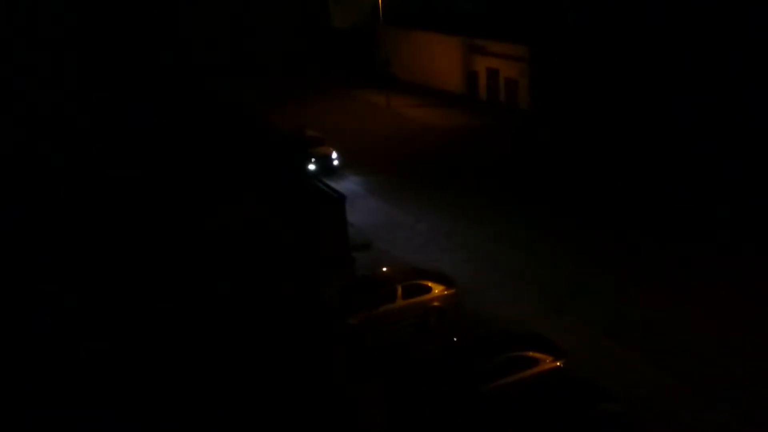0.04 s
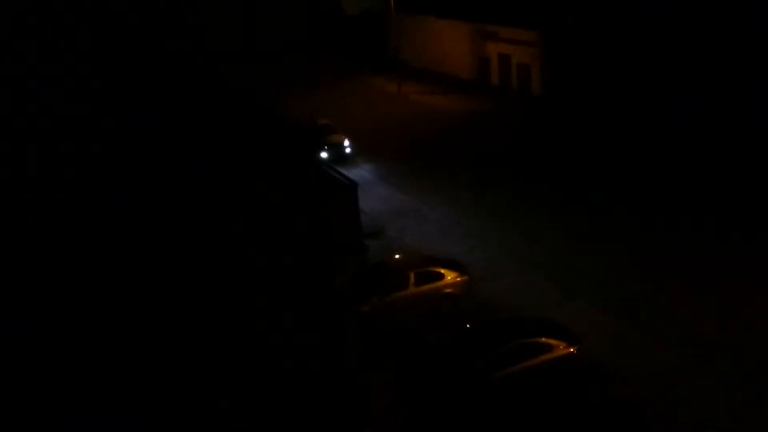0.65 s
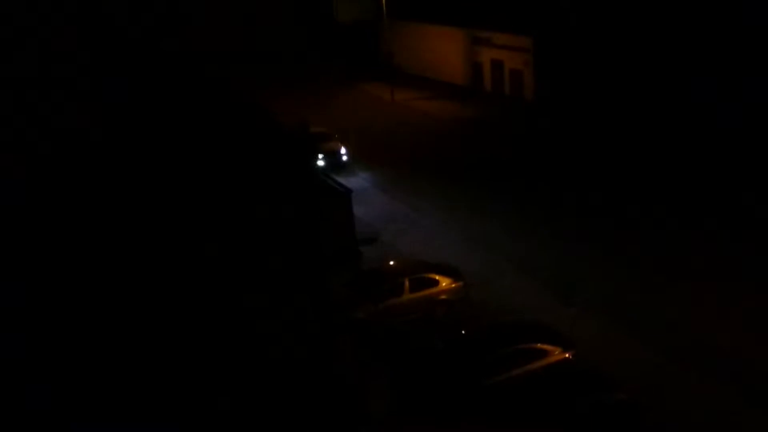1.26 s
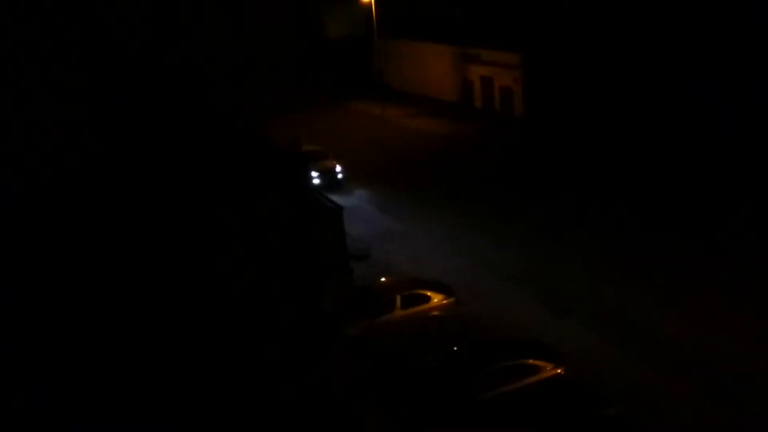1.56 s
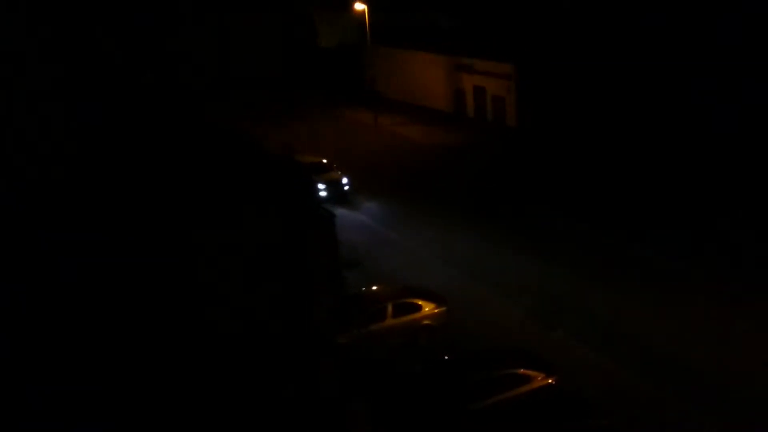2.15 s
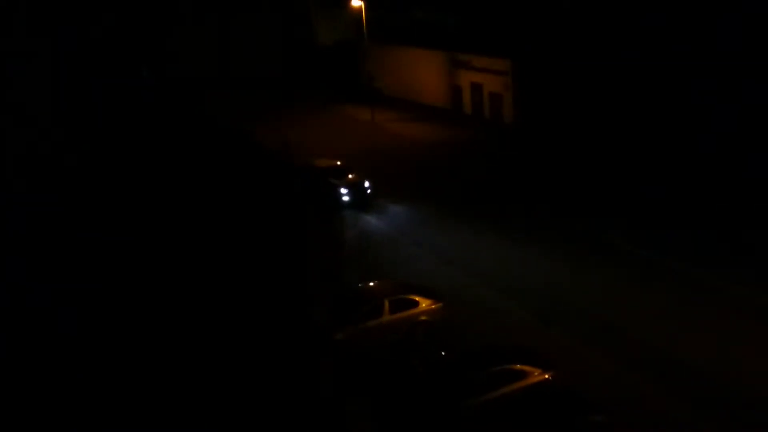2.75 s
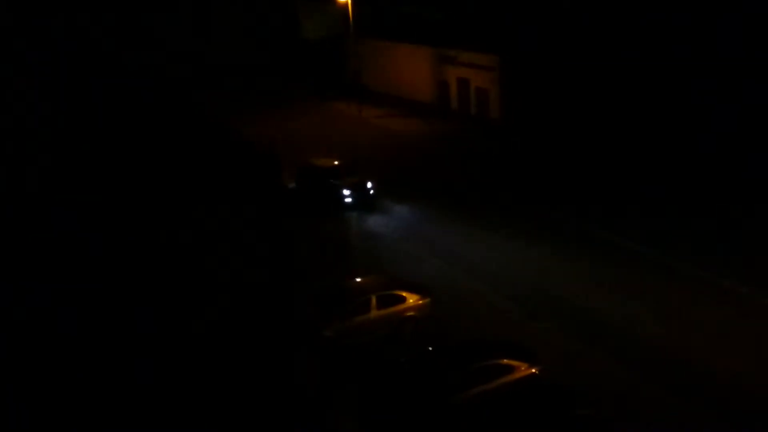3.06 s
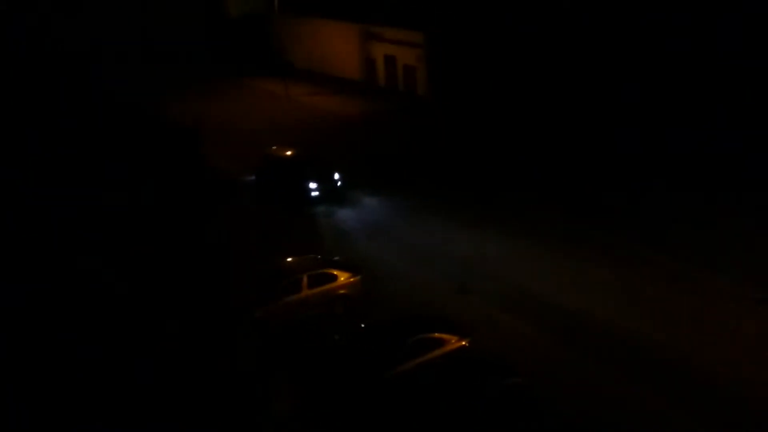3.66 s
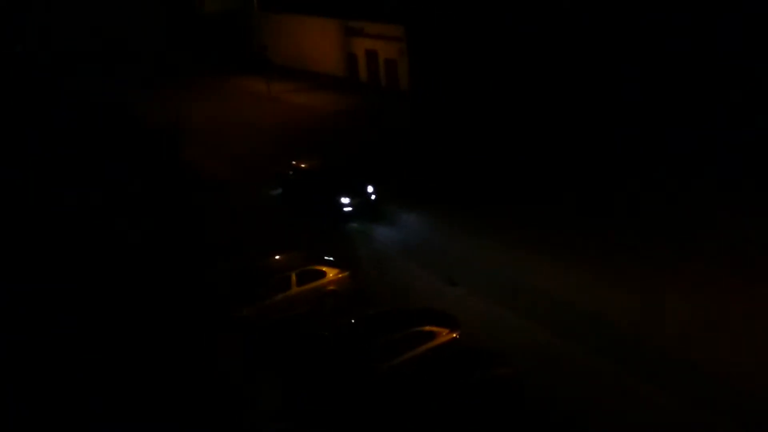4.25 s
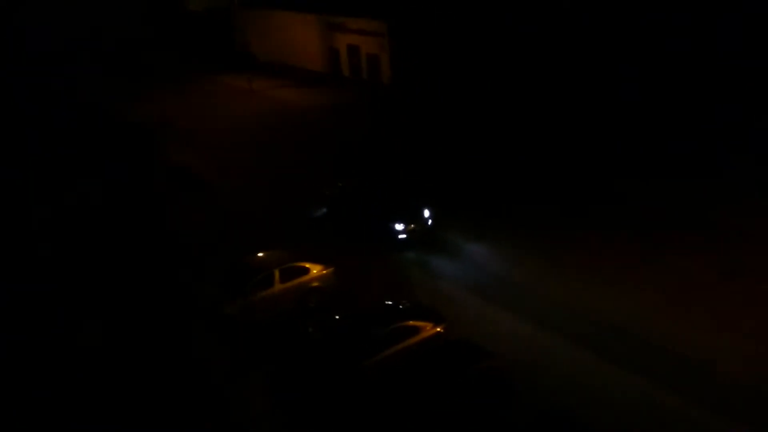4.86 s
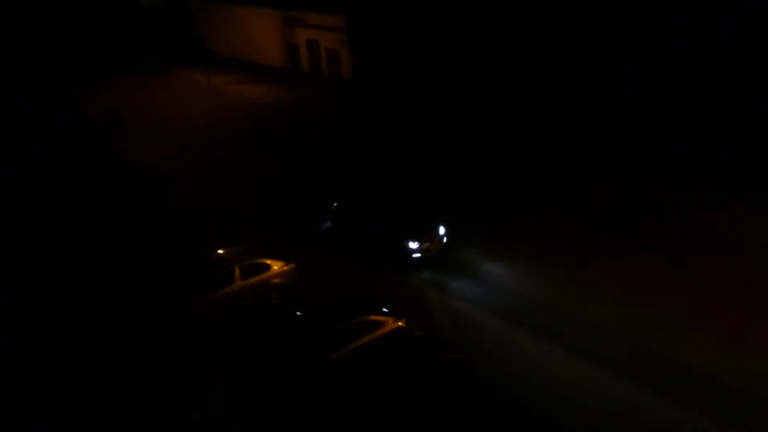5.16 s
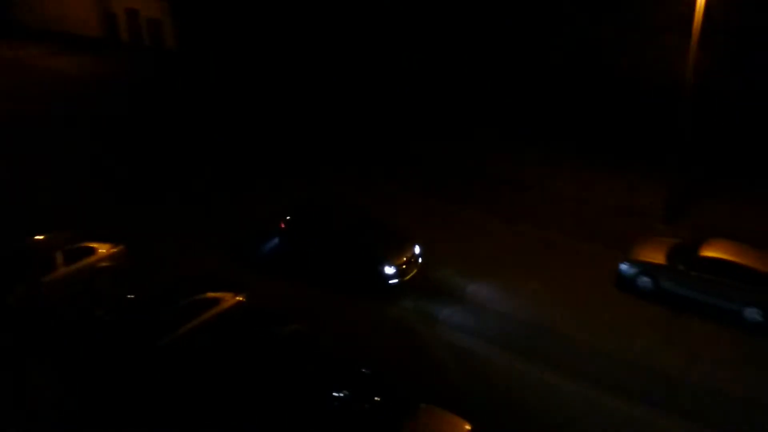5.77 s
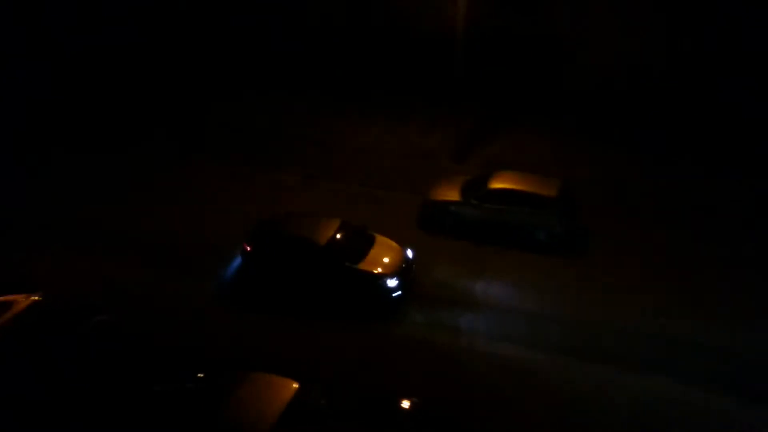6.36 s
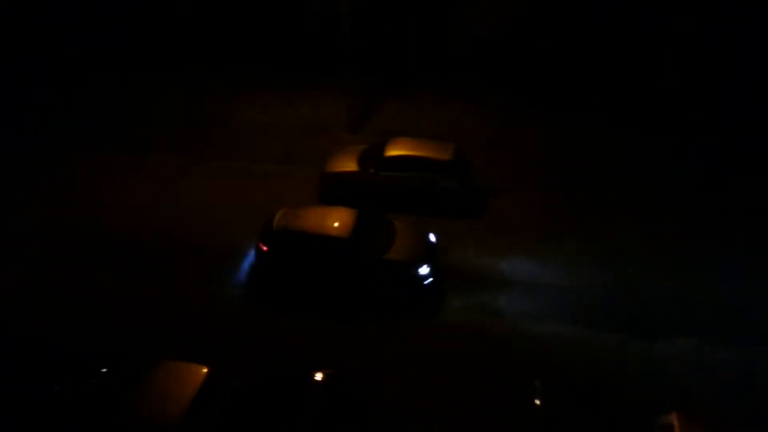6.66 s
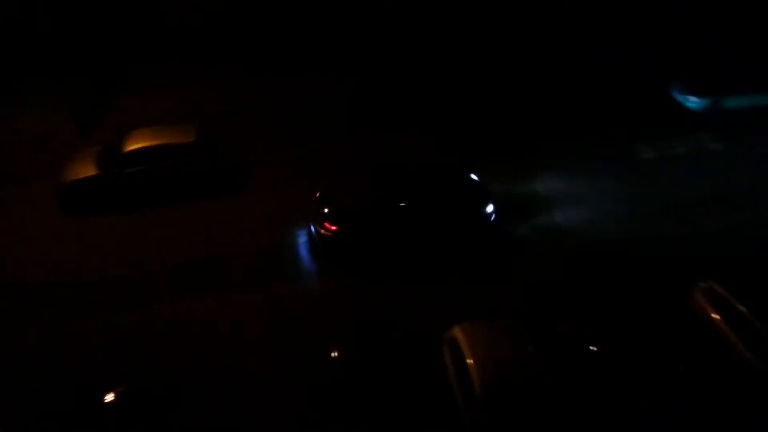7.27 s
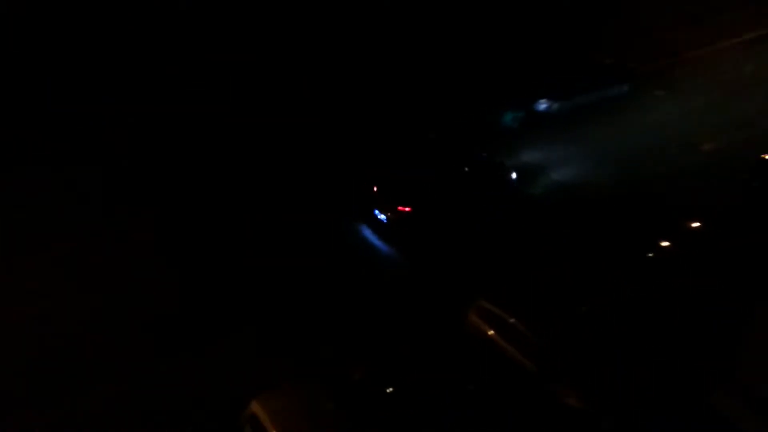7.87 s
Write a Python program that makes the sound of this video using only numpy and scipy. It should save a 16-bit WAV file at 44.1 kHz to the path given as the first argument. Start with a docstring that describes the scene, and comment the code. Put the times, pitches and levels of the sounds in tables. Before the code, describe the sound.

Over a low town hum, a sports car growls closer in two bursts of throttle, each ending in sharp exhaust pops.

```python
"""Sports car on a night street

From above, between house fronts, a two-port microphone hears a loud four-cylinder car come up to 16 m.
It pulls, lifts off with a bang and a puff of air, pulls harder and lifts off with a volley of backfires.
Firings ring the exhaust, intake air rushes and tyres roar, at levels set by distance, revs and throttle.
The town hums behind it."""
import sys
import numpy as np
from scipy import signal
from scipy.fft import rfft, irfft, next_fast_len
from scipy.io import wavfile
from scipy.ndimage import uniform_filter1d

SR = 44100
rng = np.random.default_rng(int(sys.argv[2]) if len(sys.argv) > 2 else 0)


def master(y):
    """Save y as 16-bit WAV."""
    cut = np.clip(np.atleast_2d(y).T, -1, 1)
    pcm = np.round(cut * 32767)  # scale
    wavfile.write(sys.argv[1], SR, pcm.astype(np.int16))


N = 353682
TIME = np.arange(N) / SR

# The microphone's left port against its right. Each row: frequency in Hz, gain in dB.
LEFT_PORT_GAIN = [(60, -5), (200, -6.5), (400, -9.5), (750, -8), (1100, -13), (1500, -17.5), (2400, -9.5),
                  (3300, -6.5), (4600, -7.5), (6300, 4), (9000, 1.5), (12500, -9.5), (16000, -10)]
# Its lead, on top of opposite polarity. Each row: frequency in Hz, phase in radians.
LEFT_PORT_LEAD = [(260, 0), (1000, .3), (2000, 3.2), (3500, 3.7), (4700, 10), (5400, 11.7), (8600, 15.7),
                  (12000, 28), (16000, 48)]
# Diffuse sound at the two ports. Each row: frequency in Hz, likeness from 0 to 1.
PORT_LIKENESS = [(60, 0.92), (300, 0.71), (700, 0.76), (1400, 0.01), (3000, 0.06)]

# Noise colours. Each row: frequency in Hz, relative level in dB.
TOWN_SPECTRUM = [(25, -33), (55, -5.5), (80, -5), (400, -10.5), (600, -1), (770, 0), (1100, -1),
                 (1600, -2.5), (2200, -15), (3000, -31), (4600, -38), (7000, -35), (11000, -43.5),
                 (15000, -39)]
ROAR_SPECTRUM = [(30, -15.5), (100, -5.5), (380, -5), (700, 0.5), (1000, 1.5), (1700, 2.5), (2200, -5),
                 (3000, -13), (4000, -27), (5000, -48), (7000, -26), (11000, -43), (16000, -78)]
AIR_SPECTRUM = [(800, -38), (2000, -35), (3100, 9.5), (3900, -24), (4700, -6.5), (5500, 1.5), (7500, -7),
                (9500, -5.5), (11000, -14), (12800, -7.5), (16000, -17.5)]
CRACK_SPECTRUM = [(30, 5), (400, -35), (1500, -22.5), (3300, 3.5), (4200, -2.5), (5500, 0.5), (9500, -7.5),
                  (11000, -17.5), (13000, -10), (16000, -30)]

# Clicks close by. Each row: start in seconds, pitch and width in Hz, drive in dB, decay in seconds.
NEAR_TICKS = [(1.730, 6100, 2200, -43, .003), (1.739, 7300, 3000, -42, .003),
              (1.746, 6200, 2200, -35, .003), (1.753, 4500, 2200, -37, .003),
              (1.766, 2200, 3000, -30, .0008), (1.803, 7500, 3500, -44, .003),
              (1.815, 7800, 2600, -35, .0007)]
# Dull knocks far off, and a short scuff. Each row: start in seconds, drive in dB.
FAR_KNOCKS = [(2.719, -44), (2.786, -45), (2.825, -48)]
SCUFF_STROKES = [(3.42, -37.5), (3.44, -48)]
# A thin, high sizzle. Each row: centre and half width in seconds, level in dB.
SIZZLE_SWELLS = [(1.951, 0.76, -62), (2.9, 0.29, -60.5), (3.32, 0.24, -54)]

# Crankshaft speed. Each row: time in seconds, turns per second.
CRANK_SPEED = [(4.0, 32.8), (4.3, 35.6), (4.5, 38), (4.8, 44.8), (4.97, 48.6), (5.06, 52), (5.21, 55.8),
               (5.45, 46.3), (5.6, 39.8), (5.95, 33.8), (6.1, 38.2), (6.23, 36.4), (6.33, 37.8), (6.66, 40),
               (7.09, 44.8), (7.32, 47.8), (7.55, 51), (7.66, 45.3), (8.02, 36.4)]
# The driver's pulls. Each row: throttle opening and shutting in seconds, rasp flare and valve gain in dB.
THROTTLE_PULLS = [(4.096, 5.243, 1, -31), (6.019, 7.596, 9.5, -38)]
# Spits and backfires. Each row: start in seconds, then drive of bang, crack and thump in dB.
BACKFIRES = [(5.174, -12, -54, -30), (5.207, -2, -37, -9), (5.218, -8, -36, -16), (5.224, -9, -33, -18),
             (5.229, -10, -34, -16), (5.237, -5, -38, -18), (5.631, -9, -58, -23), (6.674, -4.5, -62, -25),
             (7.006, -5, -62, -32), (7.259, -5, -62, -32), (7.519, -4, -45, -28), (7.543, -3, -42, -24),
             (7.550, -1, -38, -20), (7.558, 5, -27, -22), (7.567, -4, -28, -25), (7.581, 4.5, -25, -21),
             (7.590, 7, -11, -18), (7.602, 5, -18, -17), (7.613, 5, -20, -13), (7.619, 2, -25, -18),
             (7.624, -2, -26, -15), (7.636, -6, -31, -21)]
# Brief rises and dips of the exhaust. Each row: centre and half width in seconds, change in dB.
BOOM_SURGES = [(5.35, 0.028, -10), (5.85, 0.071, -1), (6.02, 0.05, -11), (7.15, 0.048, -10.5),
               (7.54, 0.11, 10)]
GROWL_SURGES = [(4.35, .06, 4), (4.92, .07, 2.5), (5.03, .033, -4), (5.185, .06, 8), (6.42, .1, 2),
                (6.62, .08, 3), (6.92, .06, 2), (7.09, .085, 5.5), (7.27, .07, -7), (7.42, .045, 4),
                (7.55, .045, -5), (7.68, .07, 6.5)]
SONG_SWELLS = [(6.69, .04, 3), (6.8, .06, 2), (7.05, .06, 4), (7.14, .02, 2), (7.21, .025, -6),
               (7.31, .05, -3), (7.44, .05, 1), (7.56, .035, 6)]

# The car's resonances. Each row: frequency and width in Hz, relative gain in dB.
PIPE_MODES = [(117, 5, 6), (181, 15, -1), (226, 14, -6), (275, 16, 6), (292, 7, 1), (370, 70, -15),
              (515, 30, -3.5), (692, 18, -4)]  # standing waves of the pipe
BURBLE_MODES = [(245, 60, -4), (520, 50, -2), (680, 60, -4)]  # the silencer under uneven firings
RASP_MODES = [(810, 130, -7), (1070, 200, -4), (1400, 130, -2), (1700, 180, -2), (1940, 140, -7),
              (3270, 450, -16), (5500, 600, -20)]  # ring of silencer and tailpipe
SONG_MODES = [(1045, 30, -9), (1116, 28, 0), (1408, 40, -11)]  # the tailpipe's narrow, singing modes
BLAST_MODES = [(560, 280, -9), (830, 170, -5.5), (1120, 230, -3), (1420, 230, 0), (1700, 220, -2.5),
               (1950, 150, -5)]  # the tailpipe rung broadly by a blast
THUMP_MODES = [(88, 11, -8), (205, 41, -21), (268.4, 16, 3), (401, 570, -18), (607, 270, -11),
               (860, 67, -7)]  # the gas column
LIP_MODES = [(3420, 410, -2.5)]  # the lip of the tailpipe
VALVE_HISS_MODES = [(2420, 810, -5), (6020, 300, -12)]  # the relief valve blowing
VALVE_SPURT_MODES = [(3480, 340, -1), (5000, 1100, 5)]  # the valve cracking open
NOSE_HISS_MODES = [(4260, 870, -2.5), (6200, 480, -6)]
NOSE_WHINE_MODES = [(1678, 220, 0)]

# Level laws. Each row, in dB: base level when nearest at cruising revs, then the change per halving
# of distance, per doubling of revs, with the throttle shut and while the corner hides the car.
BOOM_LAW = (-26.5, 9, -13, -5.5, -22)
GROWL_LAW = (-27.8, 6.5, 12.5, -9, -2.5)
RASP_LAW = (-34, 7.5, 19, 0.5, 4)
SONG_LAW = (-22, 11.5, 0, -18, -3)
ROAR_LAW = (-27.5, 6.5, 15, -0.18, 1)
AIR_LAW = (-45, -0.5, 16.5, -3, 5)
NOSE_HISS_LAW = (-41.5, 11, 12, -0.5, 3.5)
NOSE_WHINE_LAW = (-37.5, 4.5, -6, 1.5, -6.5)

NEAREST_S, NEAREST_M, CAR_M_PER_S = 7.53, 16.3, 12.66
SCREENED_DB, SCREENED_UNTIL_S, UNSCREEN_S = -6, 2.91, 0.92  # houses far down the street
IN_VIEW_S, EMERGE_S = 4.89, 0.4  # the car clears the house corner
STREET_T60_S, TREBLE_LOSS_DB_PER_M = 0.6, 0.52
CRUISE_TURNS_PER_S, THROTTLE_OPEN_S, THROTTLE_SHUT_S, FLARE_S = 40, .09, .17, .068
VALVE_ATTACK_S, VALVE_FALL_DB_PER_S, SPURT_DECAY_S = .036, 30, .04
BOOM_PEAK_HZ, BOOM_PEAK_HALF_WIDTH_HZ, BOOM_PEAK_DB = 114.3, 6.3, 11.5
SONG_TURNS_PER_S, SONG_DB_PER_TURN, SONG_SAG_DB, SONG_WAVER_S = 42.2, 4.2, 4, .00018
BLAST_TOP_HZ, MICROPHONE_TOP_HZ = 2400, 15800


def from_db(db):
    """Decibels to gain."""
    return np.exp(np.asarray(db) * (np.log(10) / 20))


def rms_one(x):
    """Scale to unit power."""
    return x / np.sqrt(np.mean(x ** 2) + 1e-20)


def at_hz(points, hz):
    """Read a spectrum on a log-frequency axis."""
    f, value = np.transpose(points)
    return np.interp(np.log(hz + 1), np.log(f), value)


def colour(x, spectrum):
    """Filter by a smooth spectrum."""
    size = next_fast_len(N + 4096)
    gain = from_db(at_hz(spectrum, np.fft.rfftfreq(size, 1 / SR)))
    return irfft(rfft(x, size) * gain, size)[..., :N]


def resonate(x, modes):
    """Parallel resonances with alternating signs."""
    out = 0
    for k, (hz, width, db) in enumerate(modes):
        r = np.exp(-np.pi * width / SR)
        feed = np.array([1, 0, -1]) * (1 - r * r) / 2
        feedback = [1, -2 * r * np.cos(2 * np.pi * hz / SR), r * r]
        out = out + (-1) ** k * from_db(db) * signal.lfilter(feed, feedback, x + 1e-18)
    return out


def ramp(start_s, length_s):
    """Rises from 0 to 1 and stays there."""
    return np.clip((TIME - start_s) / length_s, 0, 1)


def bell(s, half_width_s):
    """A smooth rise and fall of height 1."""
    return np.exp(-((TIME - s) / half_width_s) ** 2)


def swells(rows):
    """Brief rises or dips of level, in dB."""
    return sum(db * bell(s, half_width_s) for s, half_width_s, db in rows)


def drift(rate_hz):
    """Slow random wander of spread 1."""
    r = np.exp(-200 * np.pi * rate_hz / SR)  # one step per 100 samples
    slow = signal.lfilter([1], [1, -2 * r, r * r], rng.standard_normal(N // 100 + 1002))[1000:]
    return np.interp(np.arange(N) / 100, np.arange(len(slow)), rms_one(slow))


def clicks(times, levels_db):
    """Single pressure spikes at the given moments."""
    out = np.zeros(N)
    out[(np.asarray(times) * SR).astype(int)] = from_db(levels_db)
    return out


def bursts(times, levels_db, decay_s):
    """Puffs of turbulence that start at once and die away."""
    envelope = signal.lfilter([1], [1, -np.exp(-1 / (decay_s * SR))], clicks(times, levels_db) + 1e-18)
    return envelope * rng.standard_normal(N)


def diffuse_noise(size):
    """White noise at the two ports: alike in the bass, unrelated in the treble."""
    padded = next_fast_len(size)
    mid, side = rfft(rng.standard_normal((2, padded)))
    alike = np.clip(at_hz(PORT_LIKENESS, np.fft.rfftfreq(padded, 1 / SR)), 0, 1)
    ports = np.sqrt(1 + alike) * mid + np.sqrt(1 - alike) * side * [[1], [-1]]
    return rms_one(irfft(ports, padded)[:, :size])


def rush(spectrum, level_db, flutter_db):
    """Broad noise whose level can flutter."""
    return from_db(level_db + flutter_db * drift(10.4)) * rms_one(colour(diffuse_noise(N), spectrum))


def hiss(level_db, modes):
    """Noise held within a few resonances."""
    return from_db(level_db) * rms_one(resonate(resonate(diffuse_noise(N), modes), modes))


def street(x, early_db, early_s, tail_db):
    """Direct sound, quick scatter from road and parked cars, and a tail between the house fronts."""
    t = TIME[:SR]
    early = diffuse_noise(SR) * np.exp(-t / early_s) * np.sqrt(2 / (early_s * SR))
    tail = diffuse_noise(SR) * from_db(-60 * t / STREET_T60_S) * (1 - np.exp(-t / 0.0062))
    echoes = from_db(early_db) * early + from_db(tail_db) * rms_one(tail) / np.sqrt(SR)
    echoes[:, 0] += 1
    return signal.fftconvolve(x[None], rms_one(echoes) / np.sqrt(SR), axes=1)[:, :N]


def town():
    """The town hums and tyres whine on a far road, a little to the left."""
    hum = rush(TOWN_SPECTRUM, level_db=-44, flutter_db=0)
    whine = hiss(-54.5 + 1.5 * drift(0.27), [(745, 150, 0)])
    return (hum + whine) * from_db([[2.5], [0]])


def small_sounds():
    """Clicks in a faint rustle by the microphone; further off a scuff, knocks and a thin sizzle."""
    ticks = 0
    for s, hz, width, db, decay_s in NEAR_TICKS:
        mode = [(hz, width, 0)]
        ticks = ticks + resonate(resonate(bursts([s], [db], decay_s), mode), mode)
    rustle = bell(1.78, half_width_s=.06) * hiss(-64 + 3 * drift(80), [(7200, 4500, 0)])
    near = (ticks + rustle) * np.array([[-.4], [1]])
    strokes = bursts(*np.transpose(SCUFF_STROKES), decay_s=0.02)
    scuff = resonate(strokes, [(1680, 220, 18), (2900, 1400, -3), (4440, 400, -2)])
    hollow = [(630, 230, 14)]
    knocks = resonate(resonate(bursts(*np.transpose(FAR_KNOCKS), decay_s=0.017), hollow), hollow)
    treble = rms_one(colour(diffuse_noise(N), [(3000, 7), (7000, -3), (11000, -5), (14500, -5)]))
    sizzle = treble * sum(from_db(db) * bell(s, half_width_s) for s, half_width_s, db in SIZZLE_SWELLS)
    return near + street(scuff + knocks, early_db=-3, early_s=0.014, tail_db=-10) + sizzle


def crank_speed():
    """Turns per second at each moment."""
    return np.interp(TIME, *np.transpose(CRANK_SPEED))


def throttle_shut():
    """0 during a pull, 1 while coasting."""
    return 1 - sum(ramp(opens, THROTTLE_OPEN_S) - ramp(shuts, THROTTLE_SHUT_S)
                   for opens, shuts, _, _ in THROTTLE_PULLS)


def passage():
    """Metres from the microphone, facing (-1 nose, 1 tail) and how far the corner hides the car (0-1)."""
    along = CAR_M_PER_S * (TIME - NEAREST_S)
    distance = np.hypot(along, NEAREST_M)
    return distance, along / distance, 1 - ramp(IN_VIEW_S - EMERGE_S, EMERGE_S)


def car_level(law):
    """Level in dB of one of the car's sounds, from distance, revs, throttle and cover."""
    near_db, closer_db, revs_db, shut_db, hidden_db = law
    distance, _, hidden = passage()
    engine_db = revs_db * np.log2(crank_speed() / CRUISE_TURNS_PER_S) + shut_db * throttle_shut()
    cover_db = hidden_db * hidden + SCREENED_DB * (1 - ramp(SCREENED_UNTIL_S, UNSCREEN_S))
    return near_db + closer_db * np.log2(NEAREST_M / distance) + engine_db + cover_db


def tyre_roar():
    """Broad noise from the tyres and engine bay."""
    return rush(ROAR_SPECTRUM, car_level(ROAR_LAW), flutter_db=0.5)


def nose():
    """Tyre hiss and a faint engine whine carry ahead of the car and fade as it turns side-on."""
    _, facing, _ = passage()
    beam = np.maximum(-facing, 0) ** 2.7
    sheen = bell(4.38, half_width_s=.42) * hiss(-62, [(7200, 1300, 0)])  # brighter near the corner
    tyres = hiss(car_level(NOSE_HISS_LAW), NOSE_HISS_MODES)
    whine = hiss(car_level(NOSE_WHINE_LAW), NOSE_WHINE_MODES)
    return beam * (tyres + whine) + sheen


def intake():
    """Air rushes in with the revs; on each lift the relief valve spurts and the pressure bleeds away."""
    distance, _, _ = passage()
    air_db = car_level(AIR_LAW) - TREBLE_LOSS_DB_PER_M * (distance - NEAREST_M)
    blow, spurt = 0, 0
    for _, shuts, _, db in THROTTLE_PULLS:
        valve_opens = shuts - VALVE_ATTACK_S
        bleed_db = VALVE_FALL_DB_PER_S * np.maximum(TIME - shuts, 0)
        blow = blow + ramp(valve_opens, VALVE_ATTACK_S) * from_db(db - bleed_db)
        spurt_decay = np.exp(-np.maximum(TIME - valve_opens, 0) / SPURT_DECAY_S)
        spurt = spurt + ramp(valve_opens, 0.0023) * from_db(db) * spurt_decay
    puff = rush(AIR_SPECTRUM, level_db=-11, flutter_db=.8)
    draught = rush(AIR_SPECTRUM, air_db, flutter_db=.6)
    return draught + blow * (hiss(-3, VALVE_HISS_MODES) + puff) + spurt * hiss(-6, VALVE_SPURT_MODES)


def gas_pulses(turns, uneven_db, rough_db, turbulence, open_share):
    """Two firings a turn, one strong and one weak: a steep front followed by a jet of turbulent gas."""
    firing = np.floor(2 * turns).astype(int)
    strength = from_db(uneven_db * (firing % 2) + rough_db * rng.standard_normal(2000)[firing])
    fronts = np.diff(firing, prepend=0) * strength
    jet = np.exp(-(2 * turns % 1) / open_share) * strength * rng.standard_normal(N)
    return rms_one(fronts) + turbulence * rms_one(jet)


def firing_boom(turns, speed):
    """The firing note swells near the lowest standing wave; with the throttle shut, firings drop out."""
    peak_db = BOOM_PEAK_DB / (1 + ((2 * speed - BOOM_PEAK_HZ) / BOOM_PEAK_HALF_WIDTH_HZ) ** 2)
    misfire_db = 9 * throttle_shut() * (.35 - np.tanh(drift(22) ** 2))
    throb_db = 1.3 * drift(16)
    level_db = car_level(BOOM_LAW) + swells(BOOM_SURGES) + peak_db + throb_db + misfire_db
    return from_db(level_db) * np.sqrt(2) * np.sin(4 * np.pi * turns)


def pipe_growl(turns, speed, level_db, odd_db):
    """Crank orders swell as they sweep through the standing waves; uneven cylinders feed the odd ones."""
    _, facing, hidden = passage()
    tilt_db = -4.5 + 10 * hidden - 8 * facing  # per octave: brighter while hidden, duller from behind
    combustion_db = 1.3 * drift(45)
    grid_hz = np.arange(1200.)
    response = np.sqrt(sum(from_db(2 * db) / (1 + (2 * (grid_hz - hz) / width) ** 2)
                           for hz, width, db in PIPE_MODES))
    note, power = 0, 0
    for order in range(3, 20):
        order_db = tilt_db * np.log2(order) + odd_db * (order % 2) + 3 * drift(11)
        blur = np.interp(order, [6, 12], [.015, .055]) * drift(16)  # high orders wander more in phase
        gain = np.interp(order * speed, grid_hz, response) * from_db(order_db)
        note = note + gain * np.sin(2 * np.pi * (order * turns + blur + rng.random()))
        power = power + gain ** 2 / 2
    return from_db(level_db + combustion_db) * note / np.sqrt(power)


def silencer_burble(turns, level_db):
    """Uneven firings burble in the silencer."""
    lumps = gas_pulses(turns, uneven_db=3, rough_db=4, turbulence=.6, open_share=.3)
    return from_db(level_db) * rms_one(resonate(lumps, BURBLE_MODES))


def tailpipe_rasp(pulses):
    """Gas pulses ring silencer and tailpipe into the street, flaring on each lift."""
    flare_db = swells([(shuts, FLARE_S, db) for _, shuts, db, _ in THROTTLE_PULLS])
    level_db = car_level(RASP_LAW) + 0.18 * swells(GROWL_SURGES) + flare_db
    rasp = from_db(level_db) * rms_one(resonate(pulses, RASP_MODES))
    return street(rasp, early_db=-3, early_s=.007, tail_db=-5)


def tailpipe_song(pulses, turns, speed, waver_db):
    """At high revs the flow sustains the tailpipe's ring; each firing feeds it and it sags between."""
    low_revs_db = SONG_DB_PER_TURN * np.maximum(SONG_TURNS_PER_S - speed, 0)
    sag_db = SONG_SAG_DB * uniform_filter1d(.5 - 2 * turns % 1, SR // 600)
    level_db = car_level(SONG_LAW) + swells(SONG_SWELLS) + waver_db - low_revs_db + sag_db
    ring = rms_one(resonate(pulses, SONG_MODES))
    held = ring / (uniform_filter1d(ring ** 2, SR // 50) + .1) ** .3  # evens out the level
    wavering = np.interp(TIME + SONG_WAVER_S * drift(5.7), TIME, held)  # bends the pitch
    return from_db(level_db) * rms_one(wavering)


def exhaust():
    """One crankshaft, less steady when coasting, times the boom, growl, burble, rasp and song."""
    speed = crank_speed()
    song_waver_db = 1.5 * drift(8)
    wobble = (0.00404 + .014 * throttle_shut()) * drift(13.72)
    turns = np.cumsum(speed * (1 + wobble)) / SR
    boom = firing_boom(turns, speed)
    growl_db = car_level(GROWL_LAW) + swells(GROWL_SURGES)
    growl = pipe_growl(turns, speed, growl_db, odd_db=-1)
    pulses = gas_pulses(turns, uneven_db=3, rough_db=2.3, turbulence=1.3, open_share=.4)
    # a small mouth radiates little bass
    pulses = signal.sosfilt(signal.butter(2, 400, "high", fs=SR, output="sos"), pulses)
    song = tailpipe_song(pulses, turns, speed, song_waver_db)
    burble = silencer_burble(turns, growl_db - 16)
    return boom + growl + burble + tailpipe_rasp(pulses) - song


def backfires():
    """Unburnt fuel explodes: it rings the tailpipe, thumps the gas column and cracks at the mouth."""
    starts, bang_db, crack_db, thump_db = np.transpose(BACKFIRES)
    bang = 0
    for k, mode in enumerate(BLAST_MODES):
        strength_db = bang_db + 2 * rng.standard_normal(len(starts))  # each blast rings differently
        blast = 7 * clicks(starts, strength_db) + bursts(starts, strength_db - 5, decay_s=.002)
        bang = bang + (-1) ** k * from_db(8) * resonate(blast, [mode])
    bang = signal.sosfilt(signal.butter(2, BLAST_TOP_HZ, fs=SR, output="sos"), bang)
    shove = clicks(starts, thump_db) + bursts(starts, thump_db - 25, decay_s=.008)
    thump = from_db(42) * resonate(shove, THUMP_MODES)
    sparks = bursts(starts, crack_db, decay_s=.0025)
    crack = from_db(10) * (colour(sparks, CRACK_SPECTRUM) + resonate(sparks, LIP_MODES))
    return thump + street(bang + crack, early_db=-6, early_s=.014, tail_db=-6)


def scene():
    """The car and the town as they reach the microphone above the street."""
    return tyre_roar() + exhaust() + backfires() + nose() + intake() + town() + small_sounds()


def record(dry):
    """The left port is mostly weaker, inverted and slightly ahead; peaks are rounded, the top is cut."""
    size = next_fast_len(N + 4096)
    lead = np.exp(1j * at_hz(LEFT_PORT_LEAD, np.fft.rfftfreq(size, 1 / SR)))
    left = irfft(rfft(colour(dry[0], LEFT_PORT_GAIN), size) * lead, size)[:N]
    ports = np.array([-left, dry[1]])
    rounded = ports / (1 + (ports / .86) ** 6) ** (1 / 6)
    return signal.sosfilt(signal.ellip(12, .1, 80, MICROPHONE_TOP_HZ, fs=SR, output="sos"), rounded)


dry = scene()
out = record(dry)
master(out)
```